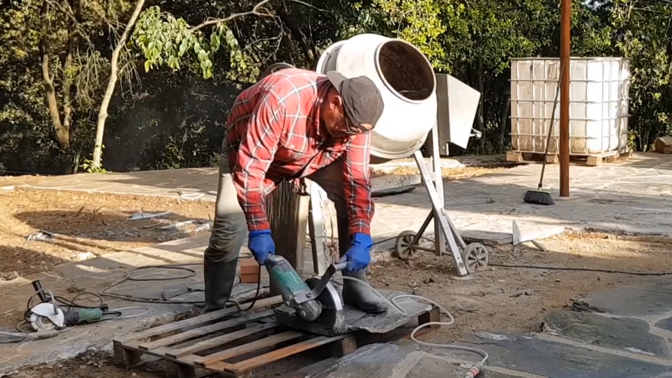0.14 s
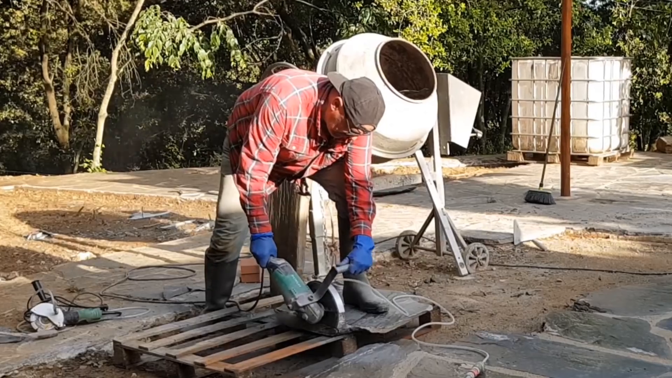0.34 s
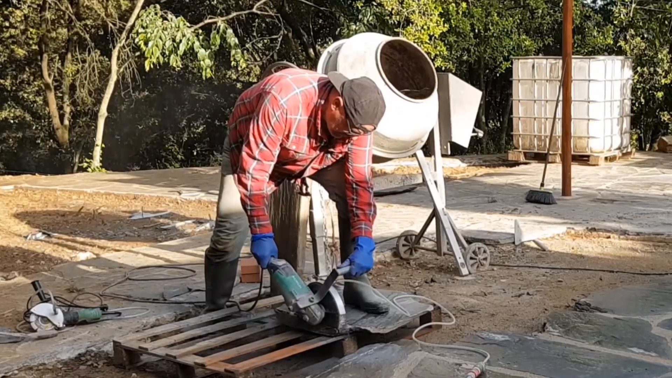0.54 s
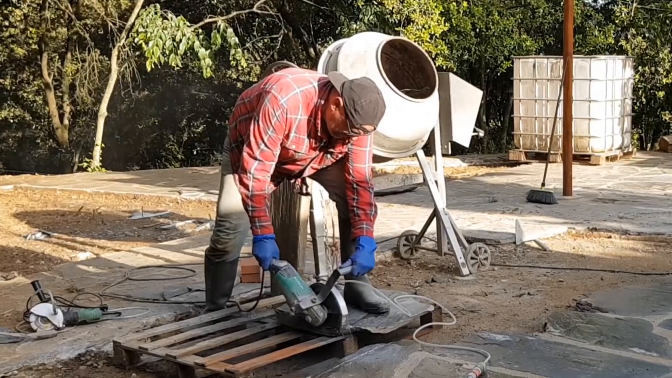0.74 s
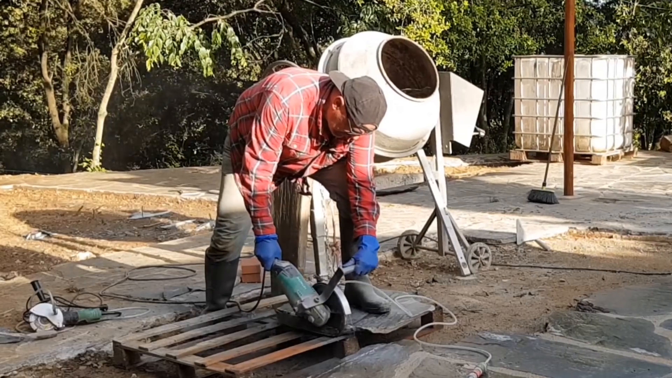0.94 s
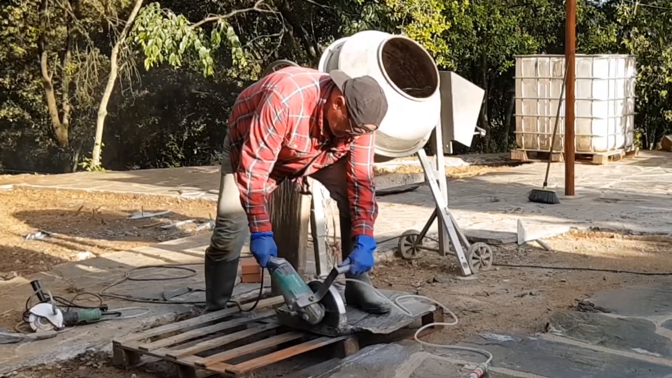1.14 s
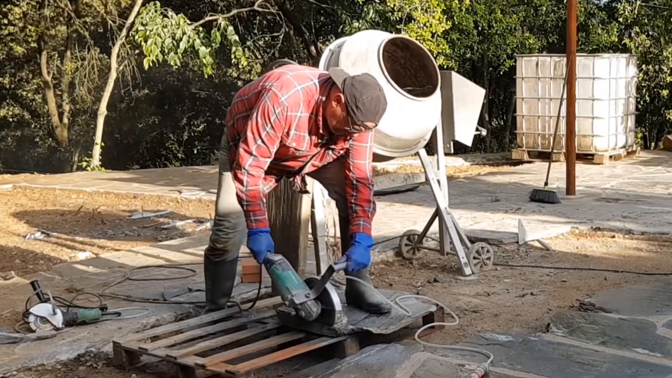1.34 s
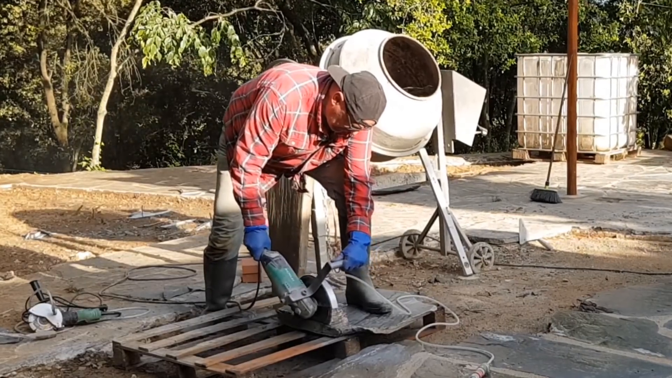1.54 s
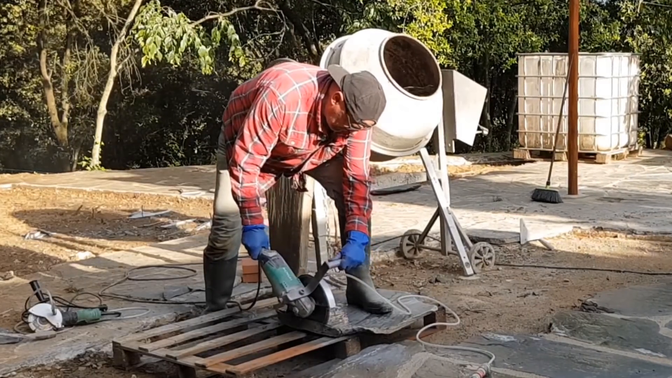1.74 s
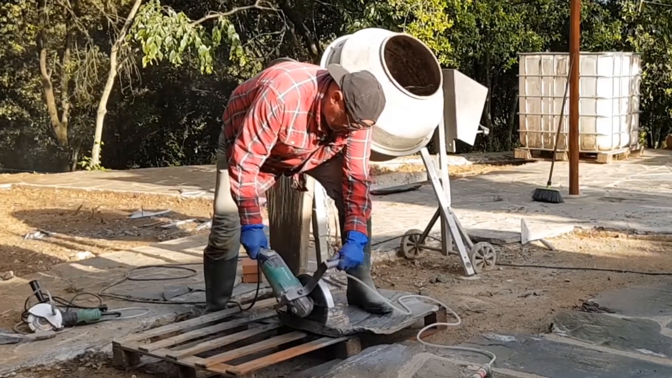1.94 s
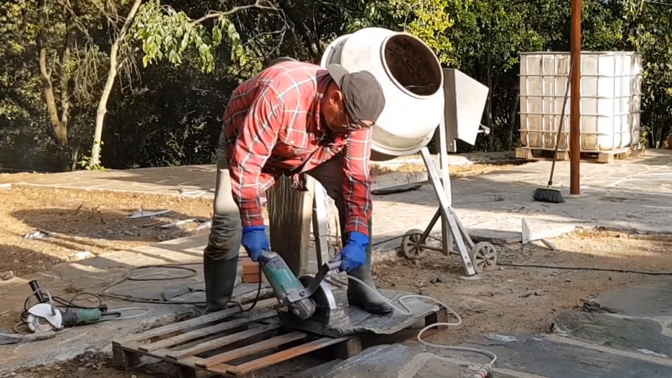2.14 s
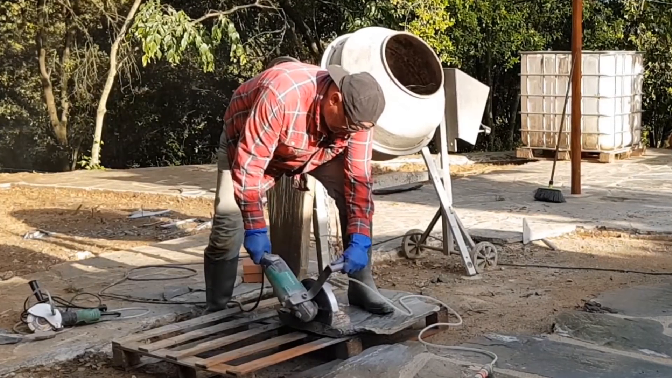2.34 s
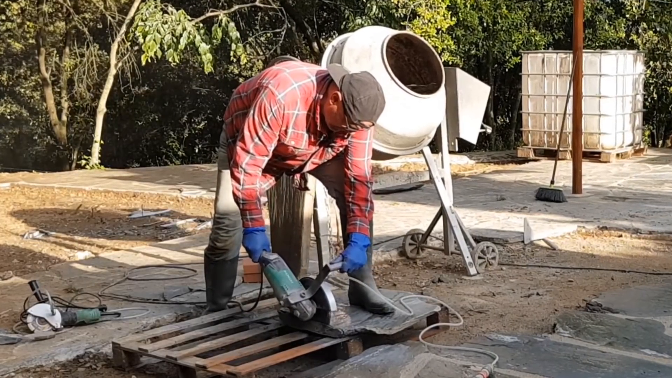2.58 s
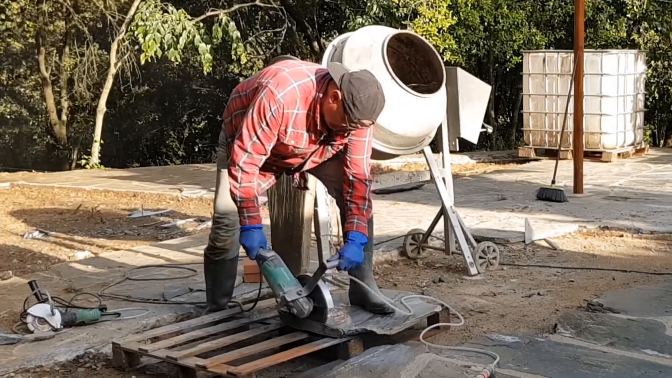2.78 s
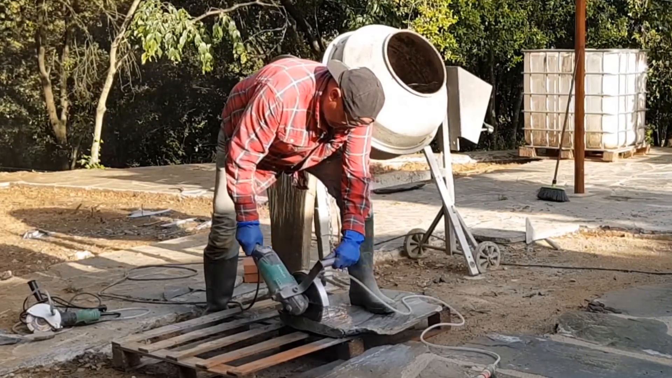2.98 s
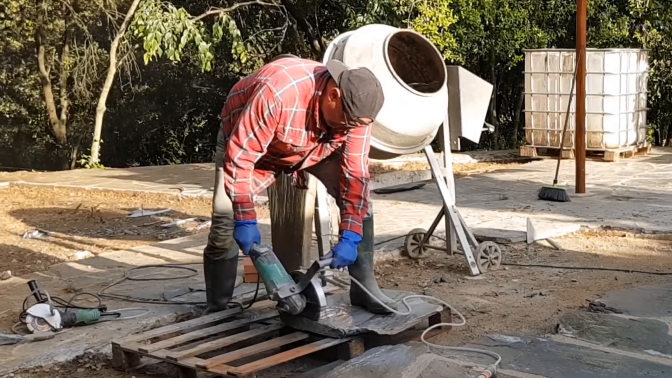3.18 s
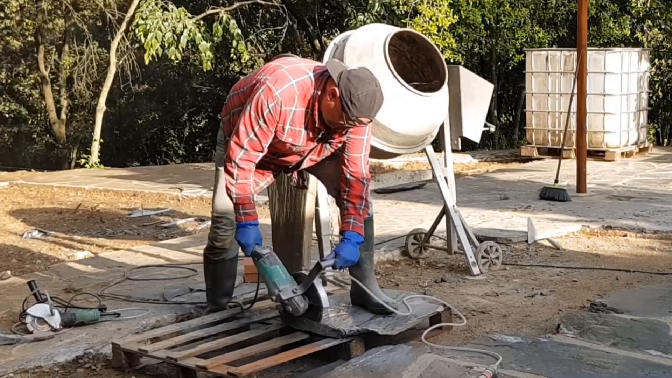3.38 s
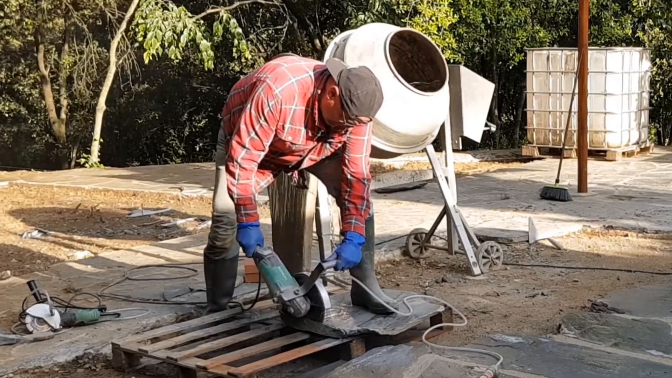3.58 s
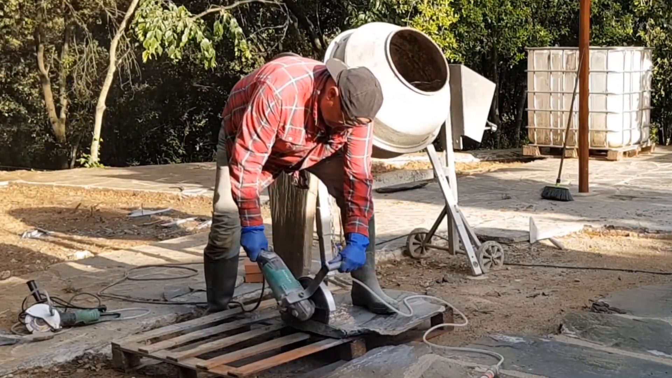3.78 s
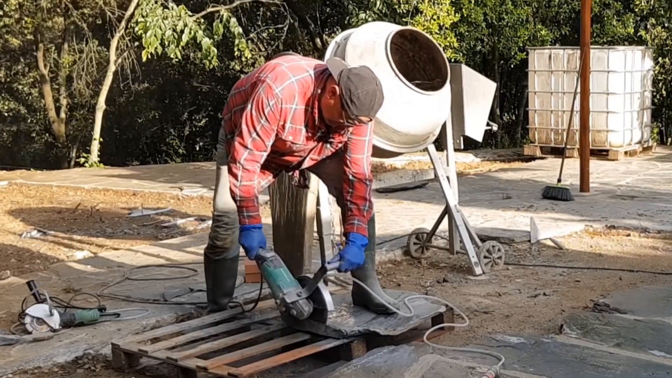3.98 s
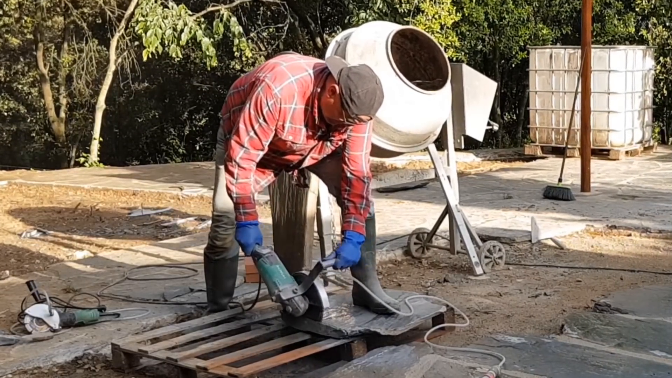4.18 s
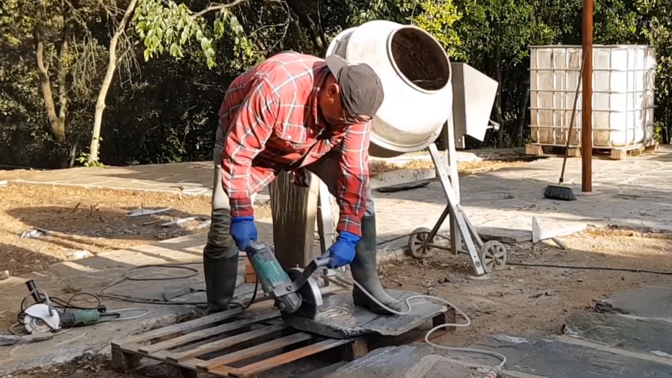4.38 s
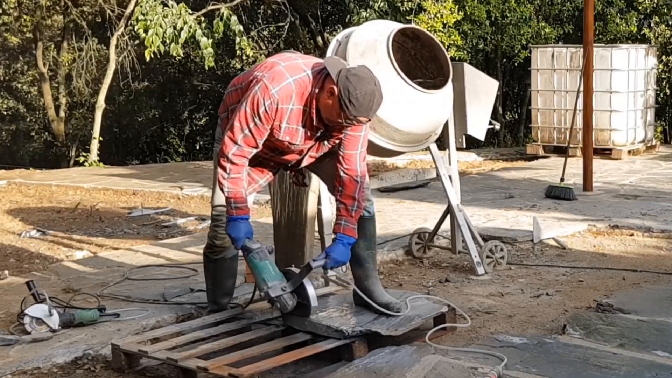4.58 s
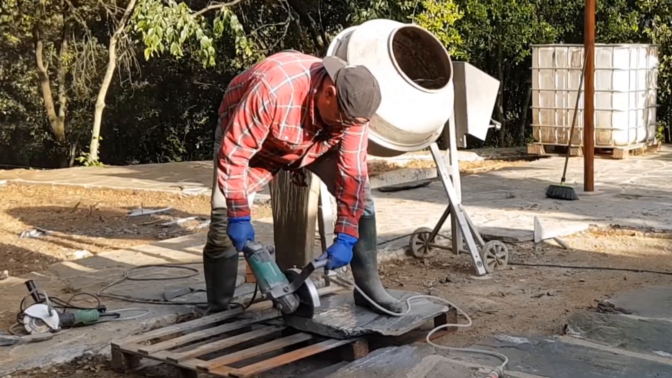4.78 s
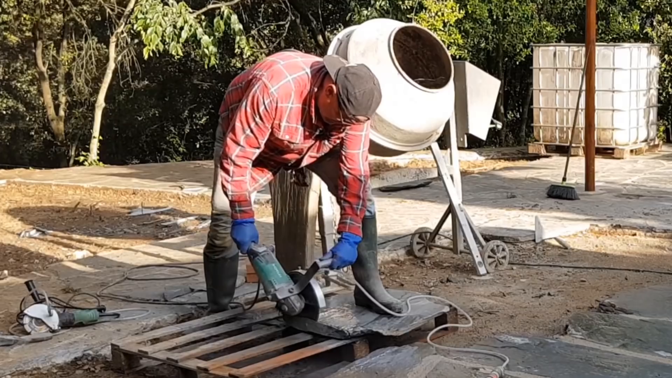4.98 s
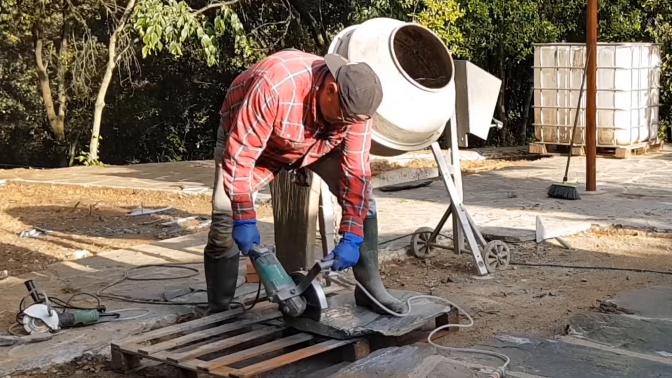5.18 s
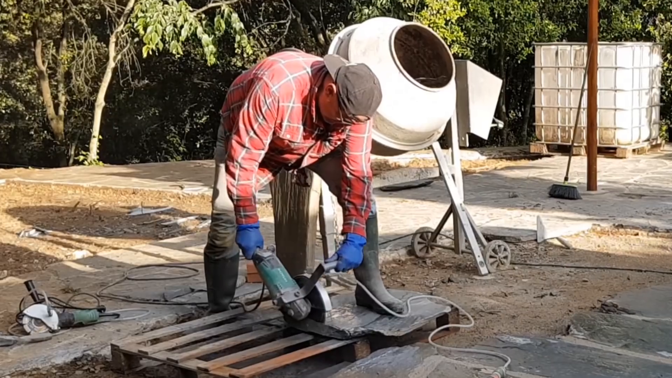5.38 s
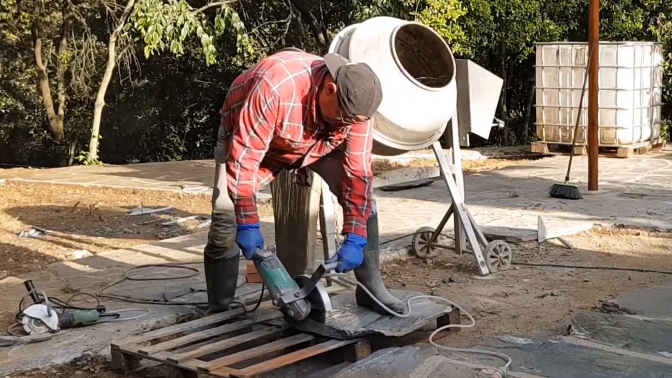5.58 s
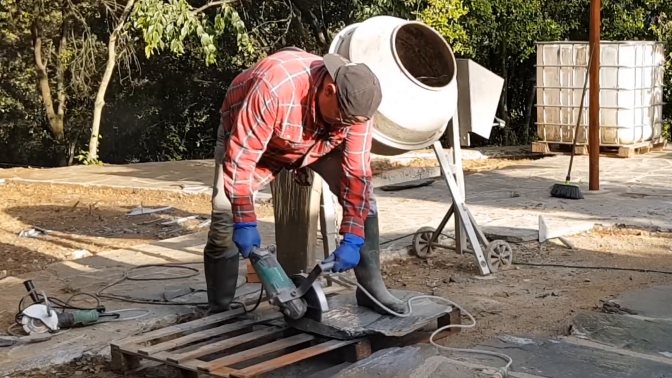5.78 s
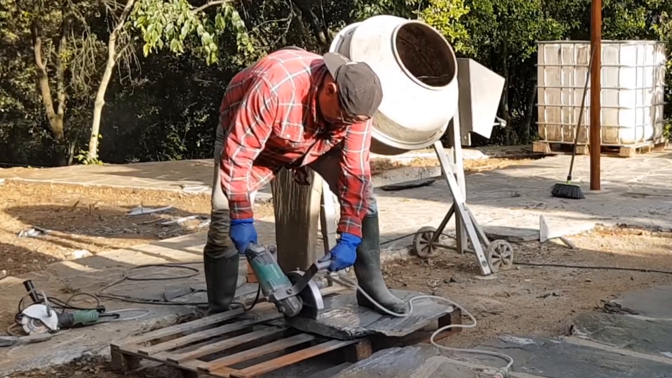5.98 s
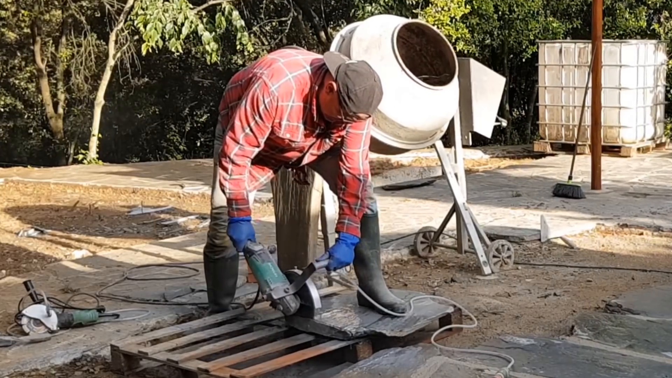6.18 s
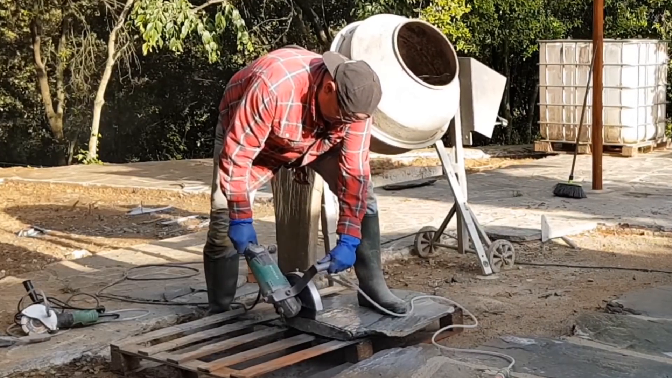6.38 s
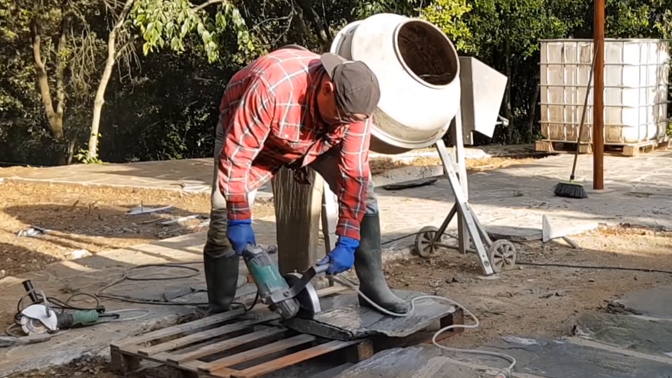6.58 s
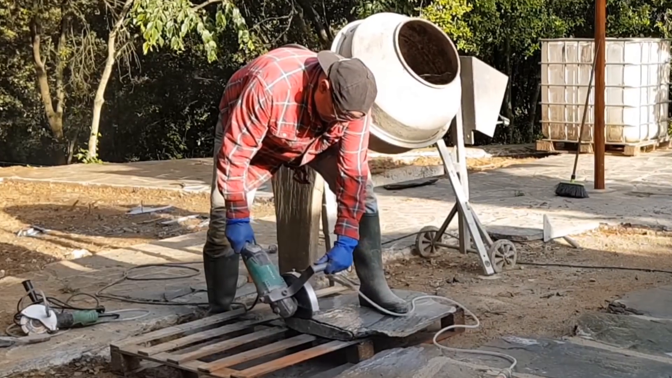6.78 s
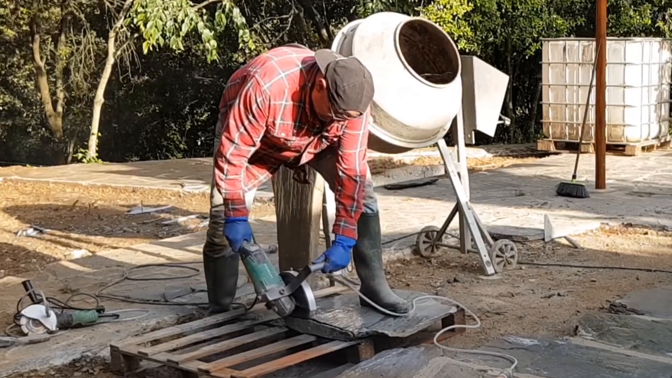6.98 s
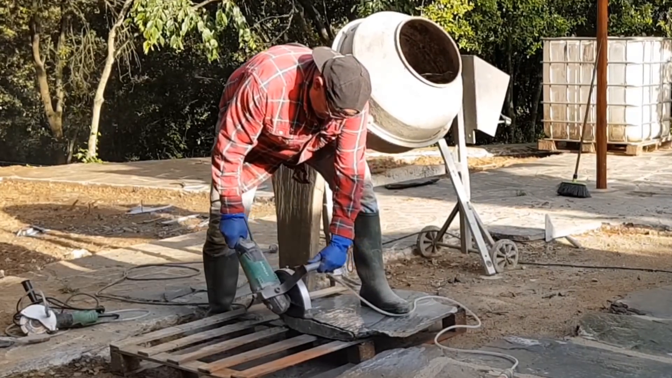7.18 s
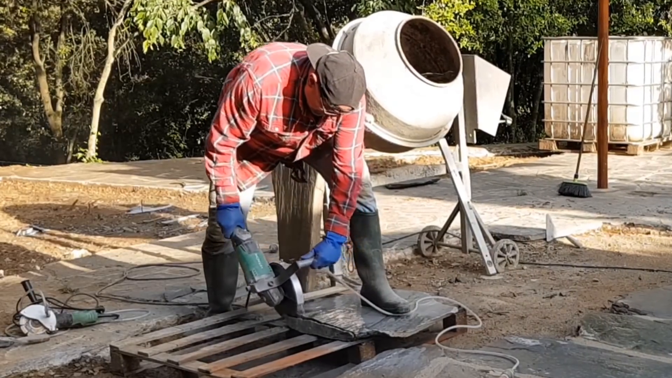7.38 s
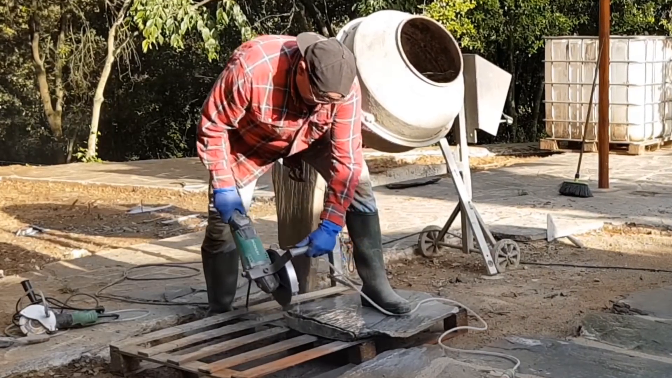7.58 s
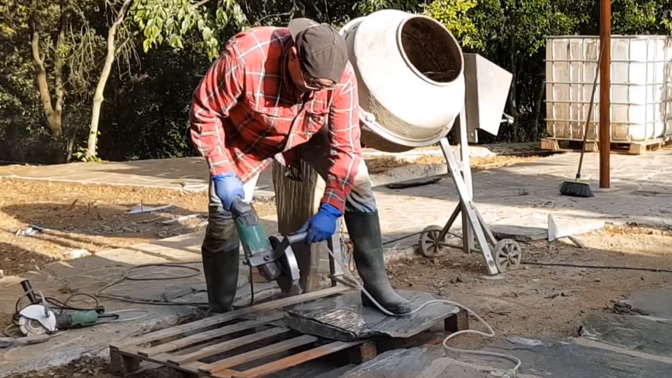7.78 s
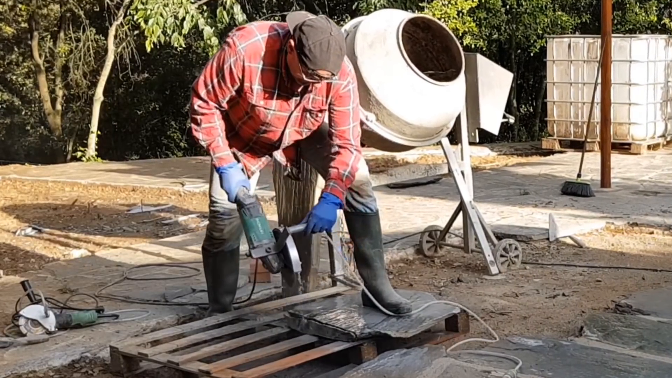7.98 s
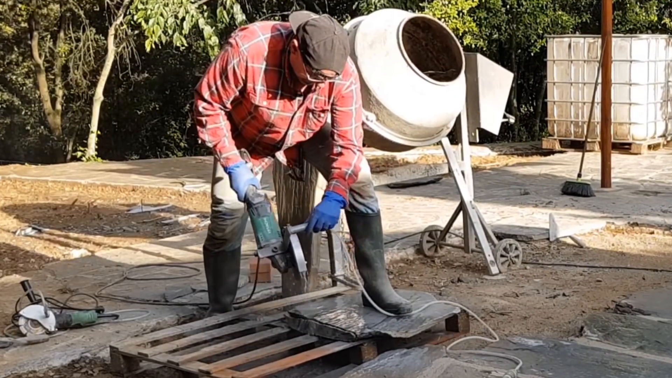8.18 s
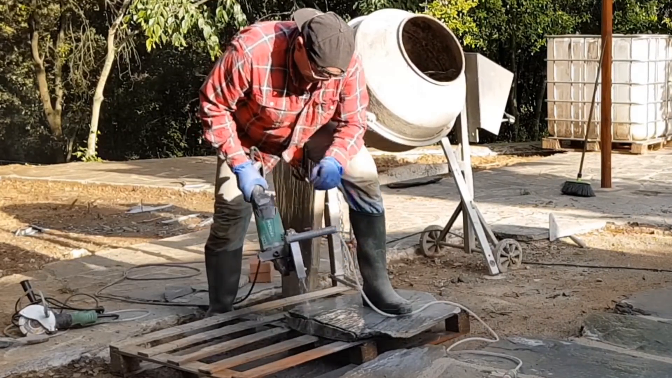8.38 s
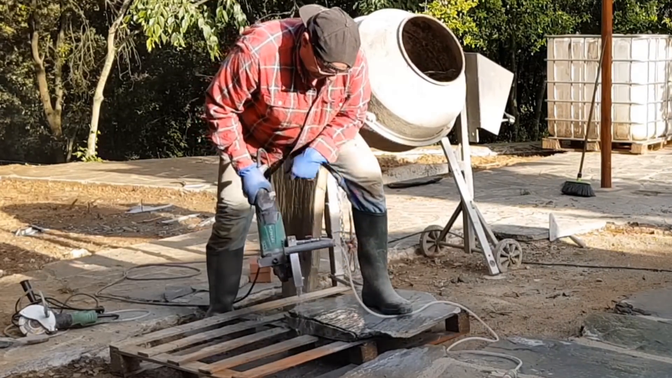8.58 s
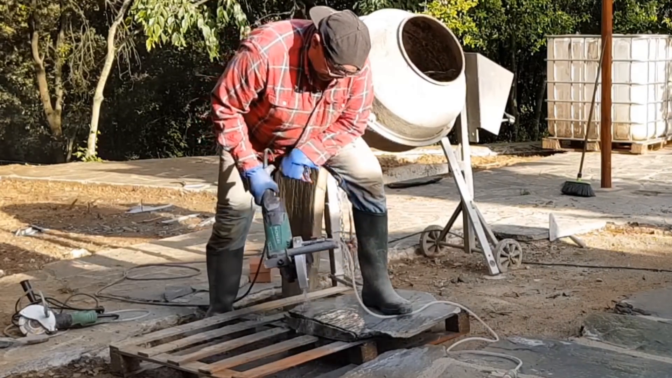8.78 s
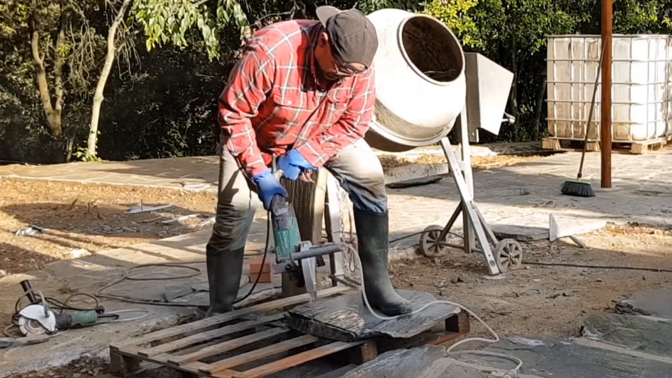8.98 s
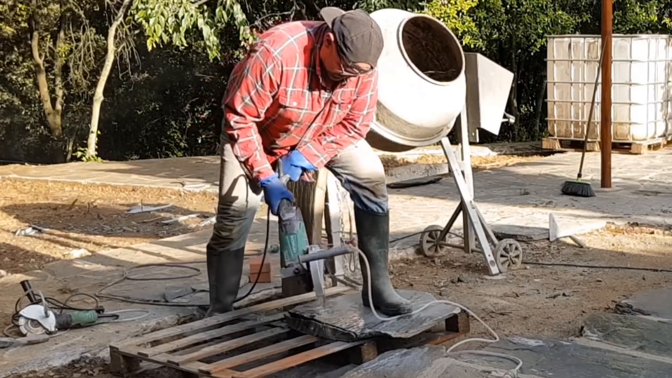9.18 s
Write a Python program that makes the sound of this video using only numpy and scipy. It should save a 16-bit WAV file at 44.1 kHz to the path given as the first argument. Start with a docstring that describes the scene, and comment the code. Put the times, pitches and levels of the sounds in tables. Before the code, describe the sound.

Close, loud and dry in an open yard, a big angle grinder is already deep in a stone slab. From 0 to about 6.7 s the steel disc screams in a dense cluster of ringing tones around 2.5-8 kHz, wrapped in harsh gritty hiss, with motor and gear whine beneath. Pressure shifts constantly: the speed sags and the stone drones around 1 s, dips come near 4 s and 5.3-5.7 s, with a tiny squeak at 5.55. Soft bumps on the pallet occur now and then. After 6.7 s the grinding drops away to light grazes near 6.9, 7.1 and 7.5 s. Power cuts at about 7.4 s; the whine glides gradually down through rushing cooling air. Thin squeals sound around 7.4, 7.8-8.1 and 8.5-9 s, while short falling chirps rattle from the loose spindle, crowding together after 8.3 s, still spinning at the end.

```python
"""A big angle grinder screams and hisses through a slate slab on a pallet in an open yard.
Grit torn from the stone, drawn as random clicks, rings the steel disc and sprays off as coloured hiss.
The slab drones as resonances; fan and gears whine as sines on multiples of the disc speed.
The disc backs out with a few last touches; the motor is switched off just before the last of them.
It coasts down in pitch with nearly pure squeals, and the loose spindle rattles in short falling chirps."""
import sys
import numpy as np
from scipy import signal
from scipy.fft import rfft, irfft, next_fast_len
from scipy.io import wavfile

SR = 44100
rng = np.random.default_rng(int(sys.argv[2]) if len(sys.argv) > 2 else 0)


def int16_out(signal):
    """Quantize to a 16-bit WAV file."""
    q = np.round(np.clip(np.atleast_2d(signal).T, -1, 1) * 32767)
    wavfile.write(sys.argv[1], SR, q.astype(np.int16))


N = 407484
TIME = np.arange(N) / SR
EDGE_S = 5.83   # the disc starts to pass the edge of the slab


def from_db(db):
    """Decibels to gain."""
    return np.exp(np.asarray(db) * (np.log(10) / 20))


def rms_one(x):
    """Scale to an rms of 1."""
    return x / np.sqrt(np.mean(x ** 2) + 1e-20)


def bell(x, centre, half_width):
    """A smooth hump of height 1."""
    return np.exp(-.5 * ((x - centre) / half_width) ** 2)


def ramp(start_s, length_s):
    """Rises from 0 to 1 and stays there."""
    return np.clip((TIME - start_s) / length_s, 0, 1)


def held(start_s, end_s, attack_s, release_s):
    """Straight attack, hold and exponential release."""
    return ramp(start_s, attack_s) * np.exp(-np.clip((TIME - end_s) / release_s, 0, 60))


def in_time(rows):
    """One curve over time per column, joined by straight lines."""
    s, *columns = np.transpose(rows)
    return [np.interp(TIME, s, c) for c in columns]


def over_hz(rows, size):
    """Each column on the frequency grid of an FFT, joined on a log axis."""
    hz, *columns = np.transpose(rows)
    grid = np.log(np.arange(size // 2 + 1) * SR / size + 1)
    return [np.interp(grid, np.log(hz), c) for c in columns]


def drift(corner_hz):
    """Slow chance with a spread of 1: noise through two equal poles, drawn at every 40th sample."""
    r = np.exp(-80 * np.pi * corner_hz / SR)
    noise = rng.standard_normal(N // 40 + 2002)
    slow = signal.lfilter([1], [1, -2 * r, r * r], noise)[2000:]   # drop the run-in
    return np.interp(np.arange(N) / 40, np.arange(len(slow)), rms_one(slow))


def coloured(x, spectrum):
    """Give x a broad spectrum; rms 1."""
    size = next_fast_len(N, True)
    return rms_one(irfft(rfft(x, size) * from_db(over_hz(spectrum, size)[0]), size)[:N])


def resonate(x, hz, width_hz):
    """Two-pole resonance with a gain of 1 on top."""
    r = np.exp(-np.pi * width_hz / SR)
    numerator = np.array([1, 0, -1]) * (1 - r * r) / 2
    return signal.lfilter(numerator, [1, -2 * r * np.cos(2 * np.pi * hz / SR), r * r], x)


def ring(x, hz, width_hz):
    """A resonance applied twice, for steep skirts; rms 1."""
    return rms_one(resonate(resonate(x, hz, width_hz), hz, width_hz))


def narrow_tone(hz, width_hz):
    """An unsteady tone on a moving pitch; rms 1."""
    phase = 2 * np.pi * np.cumsum(hz) / SR
    return rms_one(drift(width_hz) * np.cos(phase) + drift(width_hz) * np.sin(phase))


def disc_speed():
    """Turns per second: set by the load under power, then dying away by friction."""
    # speed under power, sagging as the disc is pushed: t/s, disc speed/turns per s
    powered = [(0, 69.5), (.7, 69), (1.02, 63.2), (1.25, 64.3), (1.6, 68.7), (2.25, 69), (3.05, 71.9),
               (3.6, 70.7), (4.05, 71), (4.6, 72.6), (5.15, 68.4), (5.45, 69.4), (5.85, 68.9), (6.3, 70.6),
               (6.55, 67.6), (6.9, 70.3), (7.3, 71.3), (7.43, 72.95)]
    switch_off_s, coast_loss_per_s = 7.43, .174
    return in_time(powered)[0] * np.exp(-coast_loss_per_s * np.maximum(TIME - switch_off_s, 0))


def bite():
    """How hard the disc grinds the stone, in dB against steady cutting."""
    # the long cut, a graze as the disc backs out, three last touches: start/s, end/s, level/dB
    contacts = [(-.1, 6.68, 0), (6.67, 7.56, -23), (6.84, 6.91, -9), (7.02, 7.16, -11), (7.48, 7.58, -9)]
    # the hand leans in or eases off: t/s, half length/s, change/dB
    leans = [(0.417, 0.075, 3), (1.057, .11, -4.5), (1.366, 0.15, 1.5), (4.008, 0.028, -6),
             (4.2, 0.25, 1.5), (5.252, 0.083, -3.5), (5.665, 0.071, -6), (6.694, 0.39, -3)]
    contact = sum(from_db(db) * held(start, end, attack_s=.03, release_s=.022)
                  for start, end, db in contacts)
    return 20 * np.log10(contact) + sum(db * bell(TIME, s, half_s) for s, half_s, db in leans)


def grit(per_s, spread_db):
    """Tiny fractures at random moments, a few of them much larger than the rest; rms 1."""
    at = np.flatnonzero(rng.random(N) < per_s / SR)
    sizes_db = spread_db * np.minimum(rng.exponential(1, len(at)), 4)
    clicks = np.zeros(N)
    clicks[at] = from_db(sizes_db) * rng.choice([-1, 1], len(at))
    return rms_one(clicks)


def cut(speed, bite_db):
    """The ringing disc, one squeak in the kerf and the spray of dust, all shaken by the judder of the tool."""
    # colour of the spray hiss: f/Hz, relative level/dB
    spray_colour = [(100, -53), (900, -25), (2200, -17.5), (2850, -30.5), (3200, -5.5), (3600, 7),
                    (5700, 3.5), (8300, -5.5), (9800, -3.5), (11000, 4), (13000, 0), (15600, -2.5)]
    squeak = from_db(-27.5) * bell(TIME, 5.562, .012) * np.sin(2 * np.pi * 2240 * TIME)
    dust = np.array([coloured(grit(per_s=10000, spread_db=4.0), spray_colour) for _ in range(3)])
    spray = from_db(-24 + bite_db) * wide(dust, side_db=2.5)
    # the rim runs slightly out of true and presses harder once a turn
    runout_db = 0.3 * np.sin(2 * np.pi * np.cumsum(speed) / SR)
    judder_db = 1.07 * drift(16.7) + runout_db
    return (disc(bite_db, wander_db=1.9) + yard(squeak) + spray) * from_db(judder_db)


def disc(bite_db, wander_db):
    """Grit rings the steel; modes follow the bite, the main ones also kerf depth, pinches and a slow wander."""
    # main modes, their balance shifting as the kerf deepens:
    # f/Hz, width/Hz, relative level at first/dB, slope/dB per s
    main_modes = [(2370, 330, -39, -1.37), (2688, 180, -39.5, 0.16), (3150, 134, -25.5, -0.78),
                  (3305, 130, -29.5, -0.14), (3680, 220, -29, 0.48), (3874, 200, -27.5, 0.57),
                  (4264, 47, -31, 1), (4454, 140, -25, 0.5), (4545, 64, -32, 0.99), (4980, 170, -26, -1),
                  (5255, 130, -28, 0.42), (5470, 123, -29.5, 0.74), (6080, 60, -29.5, -0.16),
                  (6560, 100, -28.5, 0.25), (6954, 81, -27.5, -0.04), (7340, 69, -34, 0),
                  (7504, 230, -29.5, -0.94), (7754, 170, -34, 0.7)]
    # crowded upper modes, all equally damped: f/Hz, relative level/dB
    high_modes = [(8260, -37), (8740, -32.5), (9250, -40.5), (9470, -34.5), (9690, -38.5), (10180, -30.5),
                  (10950, -36.5), (11440, -29.5), (11720, -48), (12200, -42), (12430, -34.5),
                  (13100, -31.5), (13520, -47), (14160, -49), (14650, -51)]
    # barely damped modes that sing on: f at first/Hz, width/Hz, relative level at first/dB
    singing_modes = [(3147, 26.5, -34), (3820, 39, -46), (3900, 45, -41.5), (4300, 55, -46),
                     (4530, 70, -42), (5405, 60, -46), (6620, 22, -43)]
    # the kerf pinches the disc, bringing out some modes or damping them:
    # t/s, half length/s, centre f/Hz, half width/Hz, change/dB
    kerf_pinches = [(.1, 0.16, 4200, 700, -4), (.25, 0.19, 6600, 120, 6.5), (1.35, 0.34, 4950, 100, 5.5),
                    (1.8, 0.34, 7660, 400, 1.5), (2.2, 0.3, 4300, 80, 1), (3.45, 0.15, 5610, 100, 15),
                    (4.9, 0.36, 6980, 100, 4.5), (6.1, 0.3, 3910, 80, 2), (5.952, 0.11, 4600, 700, 4),
                    (7.1, 0.04, 4400, 796, -12), (7.58, 0.12, 4300, 800, -16)]
    # low modes ring at the lightest touch, high ones need pressure: f/Hz, share of the bite's swing in dB
    follows_bite = [(3100, .12), (5800, .9)]
    fractures = np.array([grit(per_s=9000, spread_db=3.5) for _ in range(3)])
    pinches = [(centre_hz, half_hz, db * bell(TIME, s, half_s))
               for s, half_s, centre_hz, half_hz, db in kerf_pinches]

    def gain(hz, db, db_per_s):
        """Strength of one main mode over time."""
        pinch_db = sum(bell(hz, centre_hz, half_hz) * swing_db for centre_hz, half_hz, swing_db in pinches)
        share = np.interp(hz, *np.transpose(follows_bite))
        return from_db(db + db_per_s * TIME + share * bite_db + pinch_db + wander_db * drift(10.9))

    def shifted_grit():
        """The same fractures from another starting point, so that modes do not move in step."""
        return np.roll(fractures, rng.integers(N), axis=1)

    out = sum(gain(hz, db, db_per_s) * ring(shifted_grit(), hz, width_hz)
              for hz, width_hz, db, db_per_s in main_modes)
    high = sum(from_db(db) * rms_one(resonate(shifted_grit(), hz, width_hz=87)) for hz, db in high_modes)
    out += from_db(bite_db) * high
    # the kerf tugs at the singing modes' pitch, and they sink as the steel warms
    wander_hz, warm_sag_hz_per_s = 12, 5
    bend_hz = wander_hz * drift(2.98) - warm_sag_hz_per_s * TIME
    growth_db_per_s, singing_follows = 1.09, 0.16   # the second is a share of the bite's swing in dB
    singing = from_db(growth_db_per_s * TIME + singing_follows * bite_db)
    out[0] += singing * sum(from_db(db) * narrow_tone(hz + bend_hz, width_hz)
                            for hz, width_hz, db in singing_modes)
    return from_db(-2.5) * wide(out, side_db=-4.0)


def slab(speed, bite_db):
    """The stone drones and thrums under the disc, and bumps on the pallet."""
    # slab resonances: f/Hz, width/Hz, level/dB, change as the disc nears the edge/dB
    slab_modes = [(364, 540, -53, -9), (579, 97, -55.5, -11), (684, 135, -56, 4.5), (1198, 77, -43.5, 7)]
    # the drone rises for a while: t/s, half length/s, rise/dB
    swells = [(1.036, 0.22, 14.5), (5.202, 0.79, 12.5)]
    # bumps on the pallet: t/s, level/dB, decay/s
    bumps = [(1.56, -56, 0.13), (1.849, -46.5, .06), (3.46, -48, 0.037), (4.43, -49, .05),
             (5.451, -47, 0.017)]
    swell_db = sum(db * bell(TIME, s, half_s) for s, half_s, db in swells)
    near_edge = ramp(EDGE_S, 0.35)

    def gain(hz, db, edge_db):
        """Strength of one resonance; swells act most around 667 Hz."""
        return from_db(db + bell(hz, 667, 116) * swell_db + edge_db * near_edge + 0.42 * bite_db)

    drone = sum(gain(hz, db, edge_db) * scraped(hz, width_hz, wander_db=2.5)
                for hz, width_hz, db, edge_db in slab_modes)
    knocks = sum(from_db(db) * (TIME > s) * np.exp(-np.abs(TIME - s) / decay_s) for s, db, decay_s in bumps)
    thud = coloured(rng.standard_normal(N), [(30, -14), (120, -2), (260, 7), (600, -24), (2000, -60)])
    return drone + thrum(speed, bite_db, wander_db=3.0) + knocks * thud


def scraped(hz, width_hz, wander_db):
    """Grit drives a mode; its share wanders as the contact moves over the nodes."""
    return ring(grit(per_s=9000, spread_db=2.5), hz, width_hz) * from_db(wander_db * drift(13.0))


def thrum(speed, bite_db, wander_db):
    """The rim strikes the stone once a turn: a comb of lines that bends with the speed."""
    # strength of the lines in steady cutting: f/Hz, level/dB
    line_levels = [(420, -63.5), (490, -56.5), (570, -52.5), (640, -58), (725, -54), (820, -69),
                   (950, -55.5), (1100, -51.5), (1220, -48), (1360, -52), (1470, -59), (1620, -50),
                   (1780, -48), (1920, -65)]
    phase = 2 * np.pi * np.cumsum(speed) / SR

    def line(k):
        """The k-th multiple of the turning rate."""
        level_db = np.interp(k * speed, *np.transpose(line_levels)) + wander_db * drift(2.5)
        return from_db(level_db) * np.sin(k * phase + rng.uniform(0, 2 * np.pi))

    return from_db(.75 * bite_db) * sum(line(k) for k in range(6, 28))


def motor(speed, bite_db):
    """Cooling air rushes through the housing, which rings differently once the disc runs free; gears whine."""
    # colour of the cooling air: f/Hz, relative level/dB
    air_colour = [(60, -26), (130, -19.5), (250, -8.5), (450, -3), (880, -5), (1080, 4), (1250, 1.5),
                  (1460, 3.5), (1650, 6.5), (1950, 2.5), (2300, 2.5), (2900, 9.5), (4200, 7), (5600, 2),
                  (9000, -1), (13000, 0.5), (15800, -8.5)]
    # guard and housing resonances: f/Hz, width/Hz, level in the cut/dB, change when running free/dB
    housing_modes = [(696, 65, -58, 12), (1322, 190, -45, -13), (1680, 280, -49, 6.5), (2127, 94, -44, 2)]
    free = 1 - np.minimum(from_db(bite_db), 1)
    swell_db = 4.5 * ramp(7.66, 0.55)   # the rush of air and the overtones swell after the last touch
    rush = np.array([coloured(rng.standard_normal(N), air_colour) for _ in range(3)])
    air = from_db(-35 + swell_db) * wide(rush, side_db=4.0)
    housing = sum(from_db(db + free_db * free) * ring(rng.standard_normal(N), hz, width_hz)
                  for hz, width_hz, db, free_db in housing_modes)
    return air + yard(housing + whine(speed, swell_db))


def whine(speed, swell_db):
    """Fan blades and gear teeth sing on multiples of the speed, loudest where they sweep through a resonance."""
    # gear case resonances, lit up as the gear tone sweeps through: f/Hz, half width/Hz, gain/dB
    gear_case = [(7340, 95, -27), (8350, 360, -33), (9750, 250, -36.5)]
    # further partials of the whine: multiple of the disc speed, relative level/dB
    partials = [(72, -43.5), (90, -46.5), (108, -48), (126, -49), (144, -52), (159, -48.5), (162, -52),
                (180, -49), (198, -49), (216, -51)]
    # guard resonances that light up the partials: f/Hz, half width/Hz, boost/dB
    guard = [(5040, 50, 7), (5450, 190, 10)]
    fan_order, gear_order = 18, 134.1   # blades and teeth passing per turn of the disc
    turns = np.cumsum(speed * (1 + 0.0009 * drift(35))) / SR
    # the air vents resonate at 1258 Hz; a share of .24 of the fan tone is heard outside that
    vents = .24 + bell(fan_order * speed, 1258, 80)
    fan = from_db(-46 + 9.5 * ramp(EDGE_S, 0.91)) * vents   # rises once the disc is past the edge
    gear = from_db(-52) + sum(from_db(db) * bell(gear_order * speed, hz, half_hz)
                              for hz, half_hz, db in gear_case)
    tones = sum(gain * from_db(1.4 * drift(15)) * np.sin(2 * np.pi * k * turns)
                for k, gain in [(fan_order, fan), (gear_order, gear)])

    def overtone(k, db):
        """One partial, flickering in level and boosted near the guard resonances."""
        boost_db = sum(lit_db * bell(k * speed, hz, half_hz) for hz, half_hz, lit_db in guard)
        return from_db(db + 2 * drift(20) + boost_db) * np.sin(2 * np.pi * k * turns)

    return tones + from_db(-1 + swell_db) * sum(overtone(k, db) for k, db in partials)


def squeals():
    """Nearly pure squeals, from the ringing disc or a bearing, in short spells that glide and bend in level."""
    # spells: start/s, end/s, first f/Hz, last f/Hz, level/dB, bend of the level/dB
    spells = [(7.386, 7.46, 3300, 3310, -25.5, 8), (7.787, 8.116, 3100, 3050, -29.5, -1),
              (8.457, 9.055, 2565, 2440, -31.5, 9)]
    out = 0
    for start, end, first_hz, last_hz, db, bend_db in spells:
        hz = np.interp(TIME, [start, end], [first_hz, last_hz])
        length = end - start
        tone = 0.49 * narrow_tone(hz, width_hz=51) + np.sin(2 * np.pi * np.cumsum(hz) / SR)
        level = from_db(db + bend_db * bell(TIME, start + .38 * length, 0.14 * length))
        out = out + level * held(start, end, attack_s=.024, release_s=.031) * tone
    return out


def rattle(speed):
    """Play in the coasting spindle: chirps fall with the speed; those after 8.65 s also ring a disc mode."""
    # knocks of the loose spindle: t/s, level/dB
    spindle_knocks = [(7.64, -26), (7.687, -22), (7.792, -17.5), (7.909, -20), (7.949, -16), (8.056, -17),
                      (8.152, -15), (8.223, -19), (8.352, -16), (8.391, -16), (8.439, -16), (8.478, -16),
                      (8.527, -19), (8.626, -15), (8.668, -18), (8.702, -13), (8.742, -21), (8.769, -17),
                      (8.788, -19), (8.813, -19), (8.841, -19), (8.874, -18.5), (8.918, -15.5), (8.95, -17),
                      (8.988, -24), (9.045, -17), (9.085, -16), (9.113, -17.5), (9.156, -21),
                      (9.194, -17.5), (9.226, -19)]
    half_s, gap_s = .003, .033   # half length of a tick; spacing of the light chatter between the knocks
    pitch_hz = 59.5 * speed + 90 * drift(216.6)   # a multiple of the disc speed, with a wobble
    chirp = np.sin(2 * np.pi * np.cumsum(pitch_hz) / SR)
    chatter = [(s + gap_s * rng.normal(0, 0.12), -27.5 + rng.normal(0, 2))
               for s in np.arange(spindle_knocks[0][0], TIME[-1], gap_s)]
    out = np.zeros(N)
    for s, db in list(spindle_knocks) + chatter:
        near = slice(*np.searchsorted(TIME, [s - .012, s + .05]))
        age = TIME[near] - s
        # soft onset, then a 7 ms decay
        envelope = bell(np.minimum(age, 0), 0, half_s) * np.exp(-np.maximum(age, 0) / .007)
        ringing = envelope * np.sin(2 * np.pi * 3150 * age)
        rings_disc = s > 8.65   # the knocks and chatter after this also ring a disc mode
        out[near] += from_db(db) * (bell(age, 0, half_s) * chirp[near] + from_db(-6.5) * rings_disc * ringing)
    return out


def breeze():
    """Faint lumpy rumble of air at the microphone."""
    gust_db = 4.5 * drift(4.4)
    return from_db(-79.5 + gust_db) * coloured(rng.standard_normal(N), [(100, -3), (400, -35)])


def yard(x):
    """Two microphone ports hear x with different phase; ground and clutter add a short scatter to each."""
    # the two ports: f/Hz, phase lead of the left/rad, left-right balance/dB
    ports = [(100, -0.7, -1), (750, 0.3, -2), (1270, 1.9, 0), (1700, 1.7, -1), (2700, 0.2, 0),
             (3130, 0.3, 0), (3450, 3.4, -1), (4300, 3.3, -2), (4540, 1.6, -2), (5000, 2.6, -3),
             (5500, 4.3, -1), (6600, 4.9, -2), (7000, 4.3, 0), (7900, 6.6, -1), (8800, 4.1, -1),
             (10000, 6.5, 1), (11500, 3.6, 0), (13000, 1.0, 1), (15000, 1.0, 0)]
    size = next_fast_len(N + SR // 2, True)
    lead, balance_db = over_hz(ports, size)
    sides = np.array([[1], [-1]])
    direct = from_db(sides * balance_db / 2) * np.exp(.5j * sides * lead)
    age, t60_s = TIME[:SR // 3], .07
    scatter = rng.standard_normal((2, len(age))) * from_db(-60 * age / t60_s) * (age > .004)
    scatter /= np.sqrt(np.sum(scatter ** 2, axis=1, keepdims=True))
    return irfft(rfft(x, size) * (direct + from_db(-12.0) * rfft(scatter, size)), size)[:, :N]


def wide(x, side_db):
    """Sound from all round the tool: each port gets a part of its own beside a shared one; x holds three."""
    return from_db(side_db) * x[1:] + yard(x[0])


def scene():
    """The grinder and the slab in the yard; part of the rattle reaches both ports alike."""
    speed, bite_db = disc_speed(), bite()
    ticks = rattle(speed)
    coasting = yard(squeals() + from_db(-2) * ticks) + from_db(-6) * ticks
    return cut(speed, bite_db) + yard(slab(speed, bite_db)) + motor(speed, bite_db) + coasting + breeze()


def record(dry):
    """Peaks are clipped at full scale, then a steep low-pass removes the top."""
    low_pass = signal.ellip(12, .1, 80, 15900, fs=SR, output="sos")   # cutoff in Hz
    return signal.sosfilt(low_pass, np.clip(dry, -1, 1))


dry = scene()
out = record(dry)
int16_out(out)
```